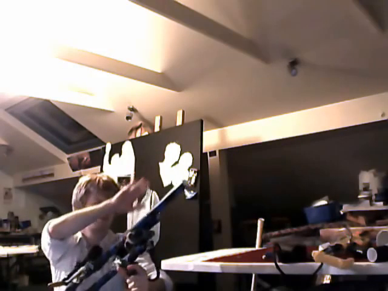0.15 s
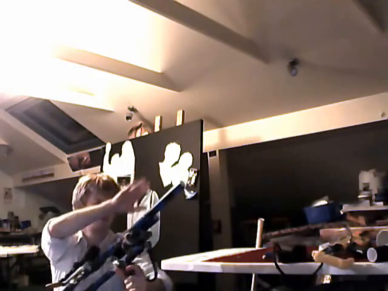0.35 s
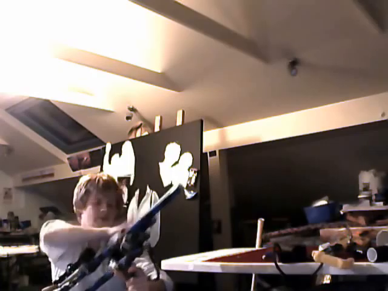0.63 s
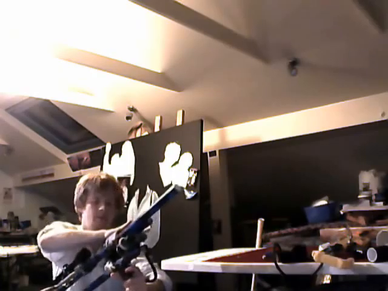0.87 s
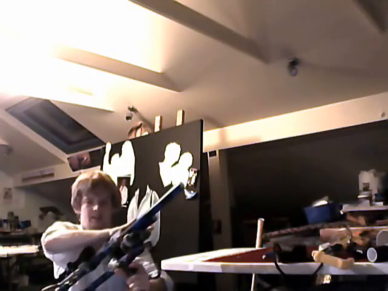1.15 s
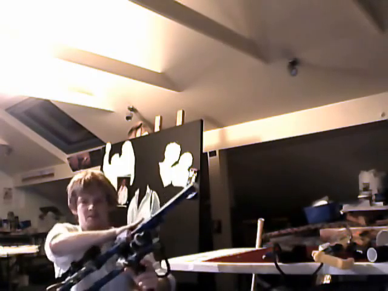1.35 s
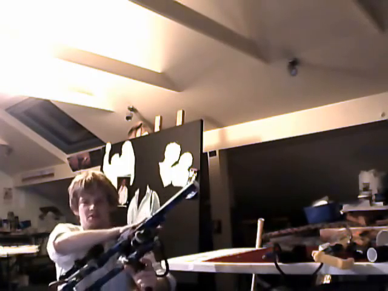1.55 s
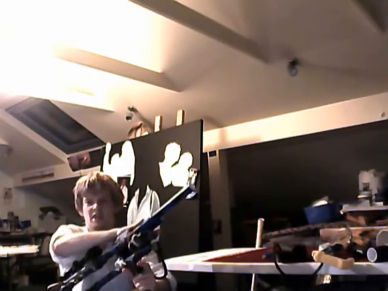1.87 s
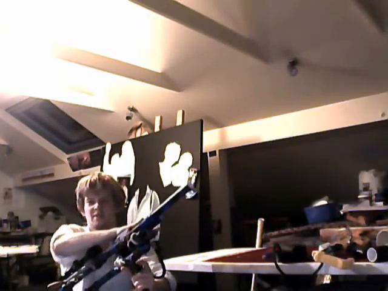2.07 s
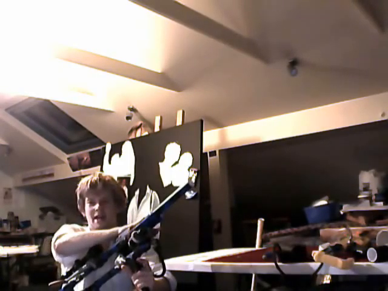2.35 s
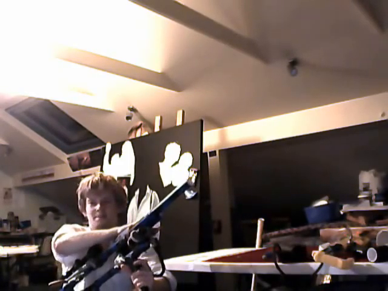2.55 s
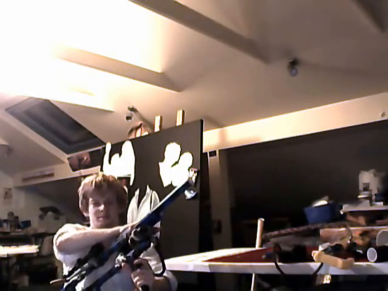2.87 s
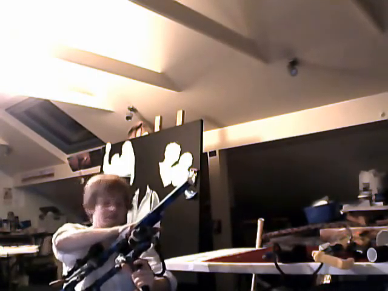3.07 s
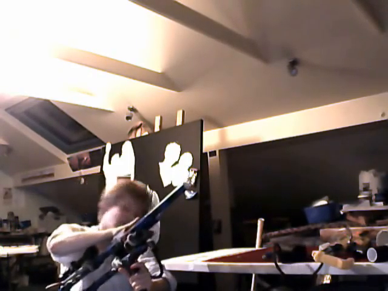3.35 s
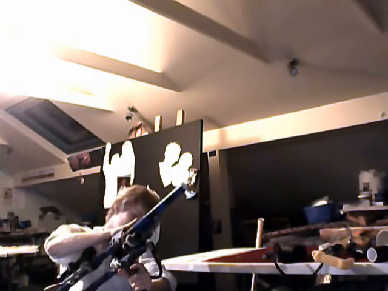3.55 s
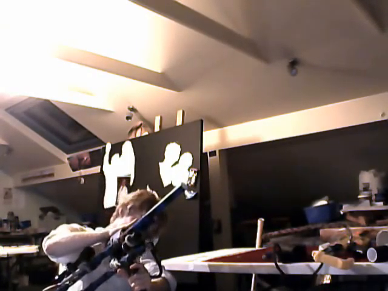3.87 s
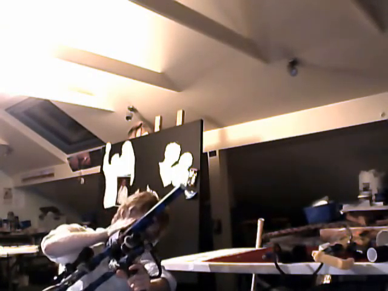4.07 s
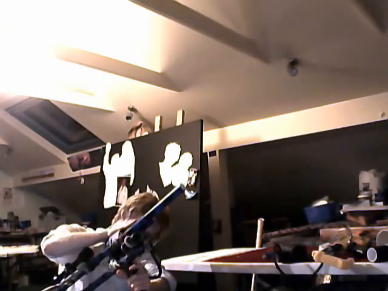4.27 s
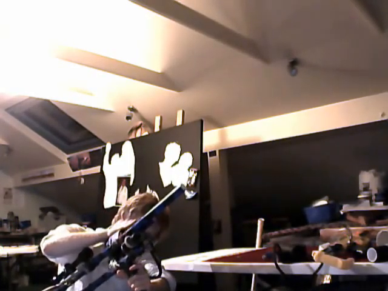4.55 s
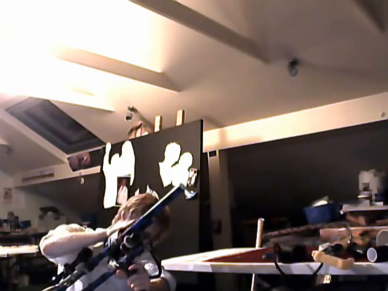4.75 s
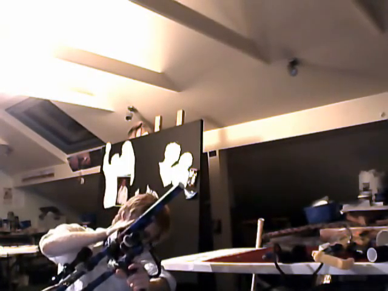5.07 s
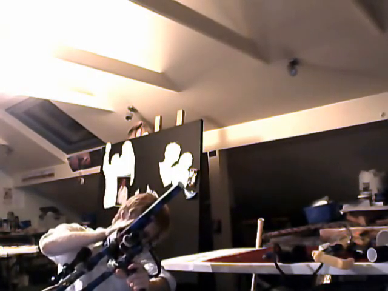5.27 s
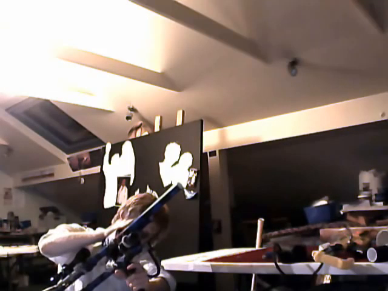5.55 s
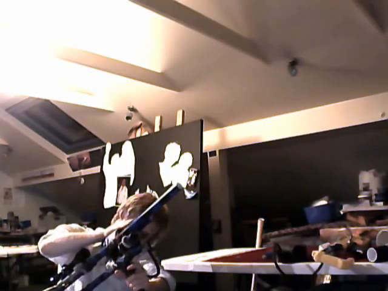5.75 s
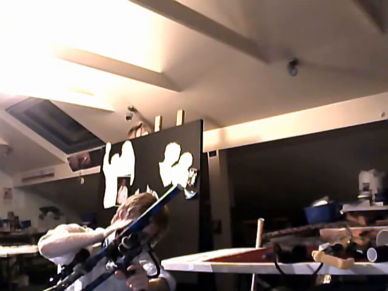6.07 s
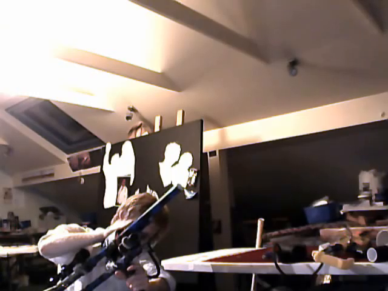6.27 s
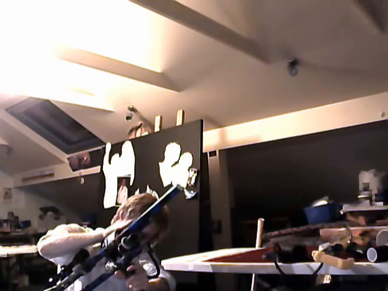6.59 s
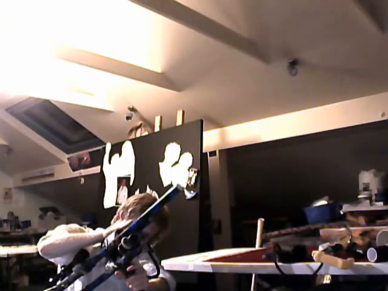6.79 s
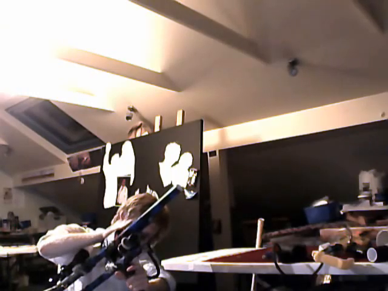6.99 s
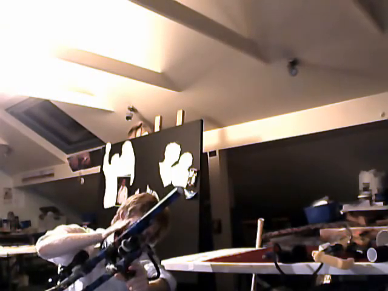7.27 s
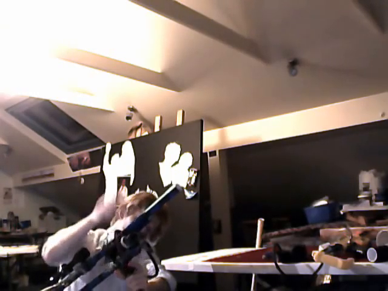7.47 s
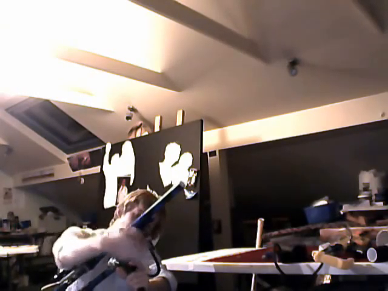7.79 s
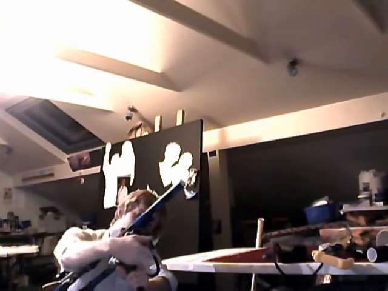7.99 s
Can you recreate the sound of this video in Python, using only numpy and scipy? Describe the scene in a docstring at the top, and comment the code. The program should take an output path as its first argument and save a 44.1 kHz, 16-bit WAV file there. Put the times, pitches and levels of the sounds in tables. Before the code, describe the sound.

A small electric air pump starts abruptly and chatters steadily, roughly thirty-five strokes a second, hissing and throbbing with a thin gear whine and a sharper tapping around the middle. After about seven seconds it stalls, puffs, restarts briefly, stalls again and resumes until the end. Indoor workshop, dry and near, low rumble beneath; harsh, clipped sound from a poor camera microphone with constant rapid little dropouts and ticks.

```python
"""Small piston compressor in a workshop

It starts, stalls twice for a moment and picks up again, over a low room rumble.
Sines tied to the crank hum; noise patterns that return each turn clatter under a hiss throbbing mostly
twice a turn. A gear whines, a part taps, short rings sound near two of the switch-ons, valves puff in the stalls.
A cheap camera input with a large offset overloads and loses a few samples about every 80 ms."""
import sys
import numpy as np
from scipy import signal
from scipy.fft import rfft, irfft, next_fast_len
from scipy.io import wavfile

SR = 44100
rng = np.random.default_rng(int(sys.argv[2]) if len(sys.argv) > 2 else 0)


def int16_out(signal):
    """Quantize to a 16-bit WAV file."""
    q = np.round(np.clip(np.atleast_2d(signal).T, -1, 1) * 32767)
    wavfile.write(sys.argv[1], SR, q.astype(np.int16))


N = 358533


def gain_of(db):
    """Turns decibels into a factor on the wave."""
    return 10 ** (np.asarray(db) / 20)


def evened(x):
    """Scales a signal to an average (rms) level of 1."""
    return x / np.sqrt(np.mean(x ** 2) + 1e-20)


def read(points, hz):
    """Reads a frequency table between its points, on a logarithmic pitch scale."""
    f, value = np.transpose(points)
    return np.interp(np.log(hz + 1), np.log(f + 1), value)


def follow(points, t):
    """Reads a time table between its points, in straight lines."""
    return np.interp(t, *np.transpose(points))


def colour(x, gains):
    """Filters a sound by multiplying its spectrum by gains(hz)."""
    size = next_fast_len(N)
    hz = np.fft.rfftfreq(size, 1 / SR)
    return irfft(rfft(x, size) * gains(hz), size)[:N]


def drift(t, top_hz, low_hz=0.118):
    """Random wandering of rms 1: twelve slow sines, the slower ones larger."""
    hz = np.geomspace(low_hz, top_hz, num=12)[:, None]
    coarse = t[::256]  # slow enough to compute at few points
    waves = np.sin(2 * np.pi * (hz * coarse + rng.random(hz.shape))) / np.sqrt(hz)
    return np.interp(t, coarse, evened(waves.sum(0)))


# Low rumble and input hiss, only the shape counts: f/Hz, level/dB (per Hz)
ROOM_COLOUR = [(15, 1), (40, 0.5), (100, -6.5), (200, -15), (500, -24), (1000, -27.5), (3000, -31),
               (15000, -31.5)]
ROOM_DB = -30.5  # rms


def room():
    """Low rumble of the workshop over the hiss of the input: steady coloured noise."""
    noise = colour(rng.standard_normal(N), lambda hz: gain_of(read(ROOM_COLOUR, hz)) * (hz > 3))
    return gain_of(ROOM_DB) * evened(noise)


# When the motor has power: on t/s, off t/s, share of full clatter and hum at once, rise time t/s
POWER_RUNS = [(.324, 7.2, .1, 0.043), (7.42, 7.775, 0.35, 0.036), (7.996, 9, 0.4, 0.03)]


def powered(t, kick, rise_s, coast):
    """Share of full effort: a kick and a rise at each switch-on, then coast(s since off)."""
    kicks = np.broadcast_to(kick, len(POWER_RUNS))
    rises = np.broadcast_to(rise_s, len(POWER_RUNS))
    runs = []
    for (on, off, *_), at_once, rise in zip(POWER_RUNS, kicks, rises):
        risen = 1 - (1 - at_once) * np.exp(-np.maximum(t - on, 0) / rise)
        runs.append((t > on) * risen * coast(np.maximum(t - off, 0)))
    return np.max(runs, axis=0)


# Crank speed once spun up, under power: t/s, f/Hz (turns per second)
CRANK_SPEED = [(.42, 36.22), (.55, 35.56), (1.0, 35.58), (1.5, 35.45), (2.0, 35.35), (2.5, 35.42),
               (2.9, 35.23), (3.3, 34.89), (3.8, 34.93), (4.4, 34.79), (5.0, 34.92), (5.6, 34.93),
               (6.0, 34.77), (6.5, 34.51), (7.0, 34.96), (7.19, 34.1), (7.5, 35.3), (7.76, 35.1)]
# Where the input loses sound: t/s, lost t/s, crank turns missed
LOST_SOUND = [(2.42, .0212, .76), (6.44, .0201, .75), (7.42, .0201, .22)]
FULL_HZ = 35.1  # full crank speed
START_TURNS = .5  # crank angle at switch-on
KICK, SPIN_UP_S, COAST_S = .4, .03, .085  # share of speed at once, then time constants


def crank(t):
    """Speed and angle of the crank: it spins up under power, coasts without, and skips lost turns."""
    speed = follow(CRANK_SPEED, t) * powered(t, KICK, SPIN_UP_S, lambda s: np.exp(-s / COAST_S))
    missed_turns = sum(missed * (t > s) for s, _, missed in LOST_SOUND)
    return speed, START_TURNS + np.cumsum(speed) / SR + missed_turns


COAST_DB_PER_S, COAST_KNEE_S = 146, 0.028  # the fall starts gently, then nears this slope


def motor_effort(t):
    """How hard the pump works: quick rise with power, fading away once it is off."""
    kicks, rises = np.transpose(POWER_RUNS)[2:]

    def fade(s):
        return gain_of(-COAST_DB_PER_S * s ** 2 / (s + COAST_KNEE_S))
    return powered(t, np.clip(kicks, 0, 1), rises, fade)


# Broad colour of clatter, hiss and puffs, only the shape counts: f/Hz, level/dB (per Hz)
BODY_COLOUR = [(150, -30), (500, -9.5), (950, -11), (1150, -7.5), (1590, -11.5), (2100, -4.5), (2720, -6),
               (3440, -7), (4880, -2.5), (5820, -3), (6300, 1.2), (6940, 2.2), (8080, -1.5), (9510, 1.7),
               (10300, -5.5), (12300, -17.5), (15600, -22.5)]
# Narrow resonances on top, on the same scale: f/Hz, width f/Hz, level/dB
HOUSING_PEAKS = [(447, 92, -10), (622, 140, -3.5), (840, 175, -4.5), (1170, 170, -6), (2202.3, 36, -20),
                 (2567, 120, -0.5), (2947, 62, -1.5), (4530, 82, -3.5), (5380, 150, -10), (7270, 65, -24)]


def body(hz):
    """The housing as a filter: broad colour plus resonances, added as power, given as gain."""
    peaks = sum(gain_of(db) ** 2 / (1 + (2 * (hz - f) / width) ** 2) ** 2
                for f, width, db in HOUSING_PEAKS)
    return np.sqrt(gain_of(read(BODY_COLOUR, hz)) ** 2 + peaks)


# Last valve puffs while coasting: t/s, length t/s, rms level/dB at the start
VALVE_PUFFS = [(7.316, 0.015, -27), (7.39, 0.0055, -27), (7.853, 0.0099, -33), (7.912, 0.015, -30.5)]
PUFF_LOW_HZ = 4500  # weaker below this


def puffs(t):
    """Short bright bursts of air: housing-coloured noise with a sharp start and a smooth fall."""
    air = colour(rng.standard_normal(N), lambda hz: body(hz) / (1 + (PUFF_LOW_HZ / (hz + 1)) ** 4))
    shape = sum(gain_of(db) * (t > s) / (1 + ((t - s) / length) ** 4) for s, length, db in VALVE_PUFFS)
    return evened(air) * shape


# Short rings and a brief squeal near the first and last switch-on:
# t/s, starting level/dB before the soft attack, f/Hz
SHORT_RINGS = [(0.34, -13, 1130), (.386, -20, 4500), (7.994, -22, 1129)]
RING_T60 = .045  # s to fall by 60 dB


def short_rings(t):
    """Short rings near the first and last switch-on: sines with a soft start that die away quickly."""
    out = np.zeros(N)
    for s, db, hz in SHORT_RINGS:
        age = np.maximum(t - s, 0)
        attack = 1 - np.exp(-age / 0.0018)
        out += gain_of(db - 60 * age / RING_T60) * attack * np.sin(2 * np.pi * hz * age)
    return out


# Usual strength of the once-a-turn tap at full effort: t/s, level/dB at the strike
TAP_LEVEL = [(.4, -24), (2.5, -24), (3, -10.5), (4.6, -13), (6.1, -27), (8, -24)]
KNOCK_HZ, KNOCK_T60 = 4190, 0.0055  # pitch, s to fall by 60 dB
KNOCK_TURNS = .17  # crank angle of the tap


def knock(t, turns, effort):
    """A part taps at one crank angle: a short bright ring, each tap a little different."""
    at = np.flatnonzero(np.diff(np.floor(turns - KNOCK_TURNS)) > 0)
    tap_db = follow(TAP_LEVEL, t[at]) + 2.6 * rng.standard_normal(len(at))
    taps, age = np.zeros(N), t[:600]
    taps[at] = effort[at] * gain_of(tap_db)
    ring = gain_of(-60 * age / KNOCK_T60) * np.sin(2 * np.pi * KNOCK_HZ * age)
    return signal.oaconvolve(taps, ring)[:N]


# Gear whine at full speed, before its swell in each turn: t/s, rms level/dB
WHINE_LEVEL = [(.44, -25), (1.06, -27), (3.11, -24), (5.42, -24.5), (6.2, -26.5), (6.6, -29), (6.79, -26.5),
               (7.16, -30.5), (7.7, -26.5)]
MESH = 18  # whine cycles per crank turn
WHINE_RISE_S, WHINE_COAST_DB_PER_S = 0.094, 130
FOURTH_DB, FOURTH_FADE_DB_PER_S = -1.5, 3.8  # fourth multiple against the whine, fading steadily


def whine(t, turns, speed):
    """The gear's mesh tone swells and bends once a turn as the piston loads the gear."""
    swell = 1 + 0.33 * np.cos(2 * np.pi * (turns - .62))
    bend = 0.51 * np.sin(2 * np.pi * (turns + 0.12))  # radians
    size = gain_of(follow(WHINE_LEVEL, t)) / (1 + ((speed - FULL_HZ) / 4) ** 2)  # fades off speed
    size = size * powered(t, 0, WHINE_RISE_S, lambda s: gain_of(-WHINE_COAST_DB_PER_S * s))
    angle = 2 * np.pi * (MESH * turns + 0.0068 * drift(t, 2.4)) + bend
    fourth = gain_of(FOURTH_DB - FOURTH_FADE_DB_PER_S * t) * np.cos(4 * angle)
    return np.sqrt(2) * size * swell * (np.cos(angle) + fourth)


# Hum sines; piston thump below order 6, housing tones above:
# cycles per turn (rounded when played), rms level/dB before the pump mix, change level/dB as the tank fills
CRANK_ORDERS = [(1, -29, 1.5), (2, -32, -1), (3, -43, -2), (4, -40.5, -0.5), (5, -39, 0.5), (6, -45, 13),
                (7, -43, 0), (9, -40, -3.5), (10, -41.5, 7), (11, -40.5, 4.5), (13, -51, 33), (15, -47, 26),
                (16, -42.5, -2), (22, -46.5, 12), (23, -39.5, 2), (24, -33.5, -0.5), (26, -41, -1),
                (31, -45, -12), (33, -43.5, 3), (63.05, -43.5, 15), (69.46, -33, -2), (72.94, -35, -8)]
TUNED_HZ = 1.2  # off full speed by this much, the housing tones are halved


def hum(t, turns, speed):
    """Sines on the crank orders; the thump keeps one shape, higher orders waver and need full speed."""
    out, filling = np.zeros(N), t / t[-1] - .5
    tuned = 1 / (1 + ((speed - FULL_HZ) / TUNED_HZ) ** 2)
    for order, db, change_db in CRANK_ORDERS:
        k = round(order)
        start, waver = rng.random(), drift(t, 3)
        size = gain_of(db + change_db * filling)
        if k < 6:
            sign = 1 if k < 4 else -1
            out += sign * size * np.cos(2 * np.pi * k * turns)
        else:
            wave = np.cos(2 * np.pi * (k * turns + start + 0.046 * waver))
            out += tuned * size * gain_of(1.5 * waver) * wave
    return np.sqrt(2) * out


# Bench and walls: delay t/s, level/dB
EARLY_ECHOES = [(.0031, -23), (.0052, -19.5), (.0087, -21), (0.0122, -20.5)]


def echoed(x):
    """A few early reflections put fine ripples in the spectrum."""
    return x + sum(gain_of(db) * np.r_[np.zeros(round(s * SR)), x][:N] for s, db in EARLY_ECHOES)


# How much of the noise is alike each turn: f/Hz, share of power
REPEAT_SHARE = [(1000, .65), (3000, .6), (5500, .4), (7000, .2), (11000, .1)]
# One, two and three beats a turn: depth level/dB at full speed, loudest angle in turns
THROB_BEATS = [(1.47, 0.36), (2.5, 0.19), (1.5, 0.15)]
# Valve bursts are bright: f/Hz, share of the sound that throbs in full
BURST_SHARE = [(3000, 0), (4500, .3), (6500, 1), (10000, 1), (13000, .6)]
PATTERN_S, PATTERN_STEPS = 1.2, 1024  # time to blend into the next pattern, steps per turn


def clatter(t, turns, speed):
    """Noise replayed at the same crank angles, in a slowly changing pattern, with throbbing air hiss."""
    patterns = rng.standard_normal((int(t[-1] / PATTERN_S) + 2, PATTERN_STEPS))
    age = t / PATTERN_S
    older, angle = age.astype(int), (turns % 1 * PATTERN_STEPS).astype(int)
    knocks = sum(np.cos(np.pi / 2 * (age % 1 - step)) * patterns[older + step, angle] for step in (0, 1))
    alike = colour(knocks, lambda hz: np.sqrt(read(REPEAT_SHARE, hz)))
    hiss = colour(rng.standard_normal(N), lambda hz: np.sqrt(1 - read(REPEAT_SHARE, hz)))

    throb_db = sum(db * np.cos(2 * np.pi * k * (turns - at)) for k, (db, at) in enumerate(THROB_BEATS, 1))
    throb_db = throb_db * (1 + 0.17 * np.clip(1 - speed / FULL_HZ, 0, 1))  # strokes stand apart at low speed
    drive = gain_of(0.14 * drift(t, 30, low_hz=3)) * (alike + hiss)  # with a slight flutter in level
    bursts = colour(evened(gain_of(throb_db)) * drive,
                    lambda hz: body(hz) * read(BURST_SHARE, hz))
    steadier = colour(evened(gain_of(0.32 * throb_db)) * drive,  # throbs a third as deep
                      lambda hz: body(hz) * (1 - read(BURST_SHARE, hz)))
    return evened(echoed(bursts + steadier))


# Clatter at full effort; the hum follows it too: t/s, rms level/dB
PUMP_LEVEL = [(.44, -14), (.62, -15), (2.84, -15), (3.03, -14.5), (4.3, -15.5), (5.5, -15.5), (6.3, -15.5),
              (7.6, -15.5), (8.1, -15.5)]
HUM_DB = 14.5  # lift of the hum against the clatter


def scene():
    """The compressor, silent until it is switched on, in the room."""
    t = np.arange(N) / SR
    speed, turns = crank(t)
    effort = motor_effort(t)
    power = gain_of(follow(PUMP_LEVEL, t)) * effort
    background = room() + puffs(t) + short_rings(t) + knock(t, turns, effort) + whine(t, turns, speed)
    pump = gain_of(HUM_DB) * hum(t, turns, speed) + clatter(t, turns, speed)
    return (background + power * pump)[None]


# The input's clock drifts: t/s, length of a tick in ms
CLOCK_TICK = [(0, .9967), (1.7, .9952), (3, .9946), (5.7, .99455), (6.5, .9939)]
FIRST_GAP_S, TICKS_PER_GAP, TICK_PHASE = .0329, 80.375, .8  # a gap falls on a whole tick


def gap_times():
    """One gap in about 80 ticks; lost sound takes its gap along and brings the later ones forward."""
    ticks = np.floor(TICKS_PER_GAP * np.arange(110) + TICK_PHASE)
    tick_s = follow(CLOCK_TICK, ticks[1:] / 1000) / 1000
    times = FIRST_GAP_S + np.r_[0, np.cumsum(np.diff(ticks) * tick_s)]
    for s, lost_s, _ in LOST_SOUND:
        times = np.r_[times[times < s], times[times > s + lost_s] - lost_s]
    return times


GAP_S, LATE_S, CATCH_UP_S = 14.6 / SR, .001, .0478  # muted time, delay after a gap, how long it stays late
OFFSET, EDGE_HZ = .418, 15700  # constant push on the wave (full scale 1), upper band limit


def record(dry):
    """Each gap mutes the input and leaves it 1 ms late until it skips forward; then overload, band limit."""
    t, gaps = np.arange(N) / SR, gap_times()
    next_gap = np.searchsorted(gaps, t)
    since = t - np.r_[-1, gaps][next_gap]
    until = np.r_[gaps, 99][next_gap] - t
    late = np.round(LATE_S * SR) * (since < CATCH_UP_S)
    shifted = dry[:, np.maximum(np.arange(N) - late.astype(int), 0)] + OFFSET
    nearest = np.minimum(since, until)
    muted = shifted * np.clip((nearest - GAP_S / 2) * SR + .5, 0, 1)  # the offset drops out too
    overloaded = np.clip(muted, -1, .97)
    padded = np.pad(overloaded, ((0, 0), (255, 255)), "edge")
    low_pass = signal.firwin(511, EDGE_HZ, window=("kaiser", 9), fs=SR)
    return signal.oaconvolve(padded, low_pass[None], "valid")


dry = scene()
out = record(dry)
int16_out(out)
```